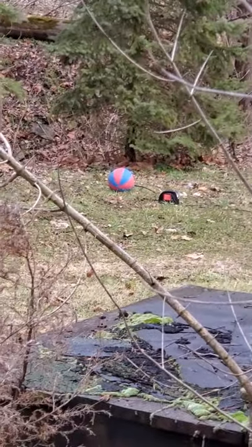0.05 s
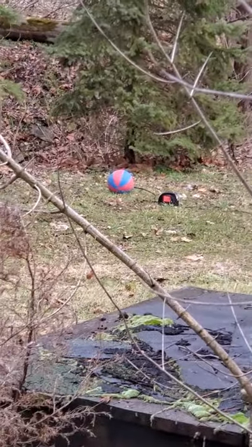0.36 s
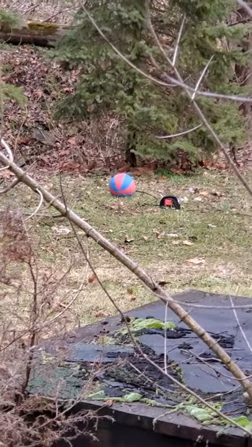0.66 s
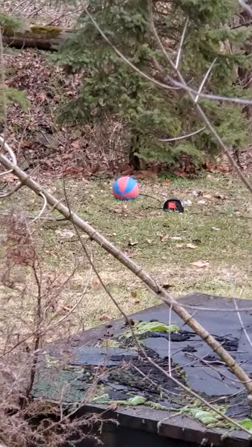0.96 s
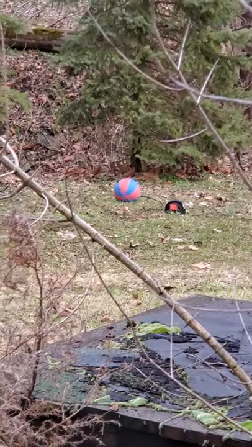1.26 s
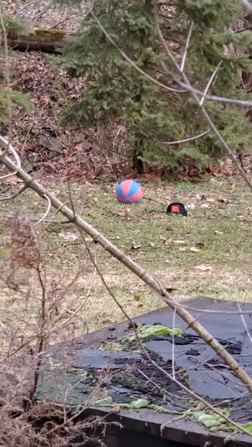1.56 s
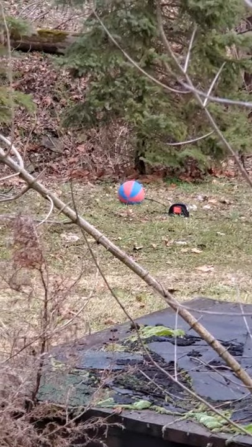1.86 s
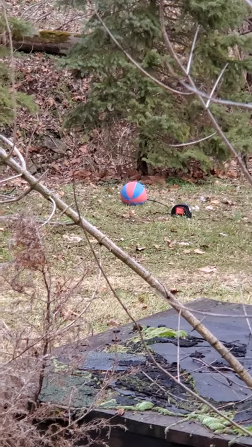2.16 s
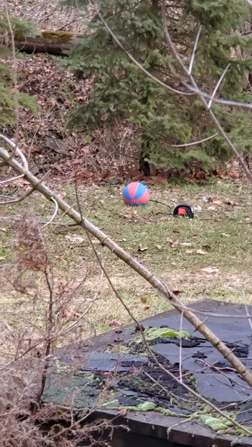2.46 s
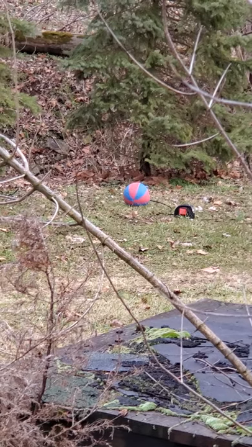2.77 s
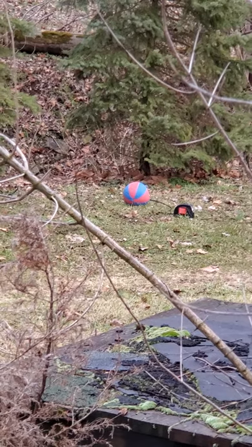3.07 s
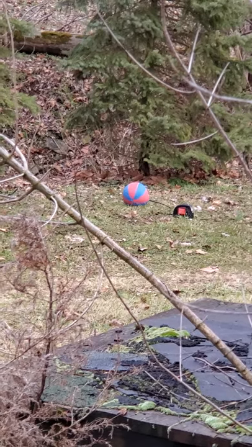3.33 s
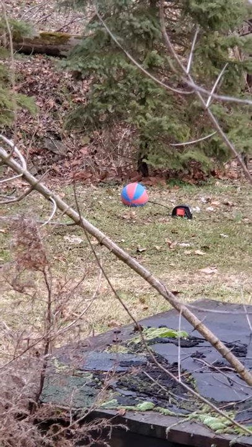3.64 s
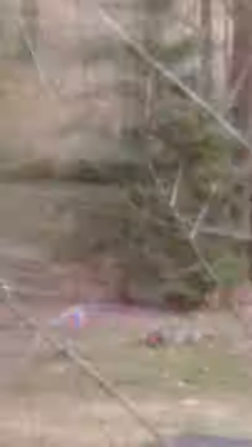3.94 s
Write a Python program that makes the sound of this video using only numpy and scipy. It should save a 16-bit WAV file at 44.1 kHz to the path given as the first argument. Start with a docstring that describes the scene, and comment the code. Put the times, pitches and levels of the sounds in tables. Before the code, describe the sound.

A ball bursts with a loud bang and short echo after an air compressor chatters quietly.

```python
"""A small air compressor chatters on a lawn, pumping up a ball, over a low outdoor rumble.
Early on comes one faint wooden tick; later a bird chirps faintly.
Near the end the ball bursts with one blast wave, which walls, trees and the slope throw back as a
short rolling echo. During the echo a few sharp ticks, likely flying scraps, land near the microphone."""
import sys
import numpy as np
from scipy import signal
from scipy.fft import rfft, irfft
from scipy.io import wavfile

SR = 44100
rng = np.random.default_rng(int(sys.argv[2]) if len(sys.argv) > 2 else 0)


def master(y):
    """Save y as 16-bit WAV."""
    cut = np.clip(np.atleast_2d(y).T, -1, 1)
    pcm = np.round(cut * 32767)  # scale
    wavfile.write(sys.argv[1], SR, pcm.astype(np.int16))


N = 176400
T = np.arange(N) / SR
HZ = np.fft.rfftfreq(N, 1 / SR)

# how alike left and right are for rushing air: f/Hz, likeness (1 = the same)
AIR_LIKENESS = [(25,1),(60,1),(250,1),(600,0.96),(1200,0.25),(3000,0.46),(15000,0.23)]


def amp(db):
    """Turns decibels into a factor to multiply by."""
    return 10 ** (np.asarray(db) / 20)


def unit(x):
    """Scales a signal to an average strength (rms) of 1."""
    return x / np.sqrt(np.mean(x ** 2) + 1e-20)


def spectrum(points):
    """Reads a table at every frequency, on a logarithmic scale."""
    hz, value = np.transpose(points)
    return np.interp(np.log(HZ + 1), np.log(hz + 1), value)


def curve(points):
    """Reads a table at every moment in time."""
    return np.interp(T, *np.transpose(points))


def add(mix, start_s, sound):
    """Mixes a sound in at a given time."""
    part = mix[..., round(start_s * SR):][..., :sound.shape[-1]]
    part += sound[..., :part.shape[-1]]


def drift(rate_hz):
    """A random wobble of strength 1; a higher rate makes it quicker."""
    return unit(irfft(rfft(rng.standard_normal(N)) * np.exp(-(HZ / rate_hz) ** 2) * (HZ > 0), N))


def noise(colour, likeness=AIR_LIKENESS):
    """Stereo noise of strength 1; its colour says how strong low and high frequencies are."""
    left, other = rfft(rng.standard_normal((2, N)))
    same = np.clip(spectrum(likeness), -1, 1)
    right = same * left + np.sqrt(1 - same ** 2) * other
    return unit(irfft(np.array([left, right]) * amp(spectrum(colour)), N))


def compressor(puff_decay_strokes=0.33, steady_flow=0.63):
    """Each piston stroke lets out puffs of rasping air; the housing hums at multiples of that rate."""
    # piston strokes per second: t/s, rate/Hz
    stroke_rate = [(0.0, 37.0), (0.46, 37.1), (1.57, 36.4), (2.2, 36.4), (2.37, 36.9), (3.7, 38.8)]
    # tones of the hum: multiple of the stroke rate, level/dB
    hum_tones = [(4,-62),(8,-70),(9,-70),(10,-62),(11,-60),(12,-68),(13,-68),(13.45,-68),(14.45,-65),(15.45,-70),(17,-71),(18,-72),(20,-68),(25,-75)]
    # puffs within one stroke: position (0-1), strength
    puffs = [(.1,1.),(.3,0.82),(.52,1)]
    # colours of the air's rasp and the higher fizz: f/Hz, relative level/dB
    rasp_colour = [(300,-3.5),(900,-6.5),(1500,-4),(2000,-16.5),(2480,-3),(2750,-8.5),(3150,0),(3400,-2.5),(3680,2.5),(3950,-16.5),(4450,-8),(4900,-21),(5500,-9.5),(5900,-33),(7500,-15.5),(8000,-18.5),(8550,-12.5),(9300,-14),(10200,-33.5),(11400,-24),(12500,-42),(14000,-39),(14600,-19),(16000,-36)]
    fizz_colour = [(2000,-25),(4100,0),(6000,-9),(9000,-6),(12000,-19),(16000,-17)]
    # how loud each is: t/s, level/dB
    rasp_level = [(0,-53),(1,-54),(2,-53),(2.8,-52.5),(3.3,-53.5),(4,-48)]
    fizz_level = [(0,-107),(1.4,-74),(2.2,-64),(2.8,-58.5),(3.3,-63),(4,-76)]
    strokes = np.cumsum(curve(stroke_rate) * (1 + .0012 * drift(rate_hz=6.4))) / SR
    hum = np.zeros(N)
    for multiple, db in hum_tones:
        strength = amp(db + 1.2 * drift(rate_hz=3.2)) * np.sqrt(2)
        hum += strength * np.sin(2 * np.pi * (multiple * strokes + rng.random()))
    puffing = sum(size * np.exp(-((strokes - at) % 1) / puff_decay_strokes) for at, size in puffs)
    rasp = amp(curve(rasp_level)) * noise(rasp_colour)
    fizz = amp(curve(fizz_level)) * noise(fizz_colour)
    return hum + unit(steady_flow + puffing) * (rasp + fizz)


def rumble(level_db=-47, swell_db=2):
    """Low outdoor air whose bass swells unevenly."""
    # colour of the rumble: f/Hz, relative level/dB
    colour = [(15,-50),(30,-25.5),(50,-6.5),(68,-0.5),(105,-4),(155,-6),(230,-13.5),(330,-15.5),(500,-20.5),(800,-18.5),(1200,-24.5),(2500,-30),(16000,-47)]
    air = noise(colour)
    bass = irfft(rfft(air) / (1 + (HZ / 220) ** 4), N)  # the part below 220 Hz
    swell = amp(swell_db * drift(rate_hz=5.6))
    return amp(level_db) * unit(air + bass * (swell - 1))


def wooden_tick():
    """One small dry tick, like a twig: a tone and gritty noise fade together."""
    # the tick: t/s, f/Hz, level/dB, time to fade by 60 dB/s
    tick = (.18,1890,-49,.06)
    start, hz, db, fade = tick
    out, t = np.zeros(N), T[:SR // 8]
    band = signal.butter(2, [hz, 2.1 * hz], "band", fs=SR)
    grit = unit(signal.lfilter(*band, rng.standard_normal(len(t))))
    add(out, start, amp(db - 60 * t / fade) * (np.sin(2 * np.pi * hz * t) + .9 * grit))
    return out


def bird(arch=.22, tail_s=0.059, blur_db=-3):
    """Thin whistles that rise and fall in pitch, blurred by the trees."""
    # chirps: t/s, length/s, top f/Hz, level/dB
    chirps = [(1.765,.04,7300,-68),(2.096,.06,7250,-59),(2.2,.045,6700,-59),(2.285,.04,6500,-64),(2.39,.035,6000,-65),(2.565,.04,6500,-64),(2.62,.03,6700,-63),(2.8,.033,7000,-67),(3.105,.05,7600,-60)]
    song, warble = np.zeros(N), .035 * drift(rate_hz=260)
    for start, length, top_hz, db in chirps:
        position = np.linspace(-1, 1, int(length * SR))  # 0 is the middle of the chirp
        hz = top_hz * (1 - arch * position ** 2 + warble[int(start * SR):][:len(position)])
        add(song, start, amp(db) * np.sqrt(1 - position ** 2) * np.sin(2 * np.pi * np.cumsum(hz) / SR))
    t = T[:SR // 4]
    trees = rng.standard_normal((2, len(t))) * np.exp(-t / tail_s)
    blur = signal.fftconvolve(song[None], trees / np.linalg.norm(trees[0]), axes=1)[:, :N]
    return song + amp(blur_db) * blur


def blast(shock_db=-3.7, shock_s=.0018, front_s=.0002, low_cut_hz=42):
    """The air pressure jumps, falls into suction and swings back a few times."""
    # swings of the released air: f/Hz, level/dB, decay/s, delay/s
    swings = [(176,-1.6,.0044,.0009),(50,-.7,.0038,.01)]
    t = T[:SR // 8]
    front = 1 - np.exp(-(t / front_s) ** 2)
    push_and_pull = (1 - (t / shock_s) ** 2) * np.exp(-.5 * (t / shock_s) ** 2)
    wave = amp(shock_db) * front * push_and_pull
    for hz, db, decay, delay in swings:
        age = np.maximum(t - delay, 0)
        wave -= amp(db) * np.exp(-age / decay) * np.sin(2 * np.pi * hz * age)
    return signal.lfilter(*signal.butter(3, low_cut_hz, "high", fs=SR), wave)


def burst(start_s=3.7833, spray_db=-20.5, spray_hold_s=.005, spray_decay_s=.0013):
    """The ball bursts and sprays air; sharp cracks set the microphone and its housing ringing briefly."""
    # sharp cracks: t/s after the burst, level/dB
    cracks = [(.0001,-3),(.0047,-13)]
    # tones of the brief ring after each crack: f/Hz, relative level/dB, time to fade by 60 dB/s
    mic_ring_tones = [(1288,-32,.06),(2515,-23,0.053),(2950,-30,0.027),(3650,-26,0.028)]
    # colour of the escaping air: f/Hz, relative level/dB
    spray_colour = [(300,-10),(1000,-16),(1800,-16),(2500,-4),(3000,0),(3700,-1),(4300,-5),(4800,-15),(6000,-11),(7200,-8),(10500,-22),(16000,-22)]
    out, t = np.zeros((2, N)), T[:SR // 8]
    add(out, start_s, blast())
    ring = sum(amp(db - 60 * t / fade) * np.sin(2 * np.pi * hz * t) for hz, db, fade in mic_ring_tones)
    for after, db in cracks:
        add(out, start_s + after, amp(db) * ring)
    spray_level = amp(spray_db) * np.exp(-np.maximum(t - spray_hold_s, 0) / spray_decay_s)
    add(out, start_s, spray_level * noise(spray_colour)[:, :len(t)])
    return out


def echo(hold_s=0.022, crackle_db=2.5):
    """Large surfaces throw the blast back; trees and the slope scatter it into crackling swells."""
    # separate echoes: t/s, gain/dB, thin below f/Hz, dull above f/Hz
    bounces = [(3.8212,-4,700,2200),(3.8256,-7,50,330),(3.8372,-7.5,40,330),(3.8495,-9,40,330),(3.8552,-10.5,70,400),(3.9635,-16,350,3000)]
    # swells of scattered sound: t/s, rise/s, decay/s, bass level/dB, treble level/dB
    swells = [(3.788,0.0044,.03,-29.5,-35.5),(3.808,0.0033,0.018,-25.5,-40),(3.821,0.0016,0.044,-24,-30.5),(3.874,0.021,0.099,-27.5,-40),(3.961,.003,.04,-32.5,-40)]
    # colours of their low and high parts: f/Hz, relative level/dB
    bass_colour = [(20,-48),(45,-10),(80,-5.5),(120,-1.5),(172,1.5),(260,-4.5),(340,-5),(500,-15.5),(700,-11.5),(900,-22),(2000,-57)]
    treble_colour = [(300,5),(800,-3.5),(1100,1),(1600,-0.5),(2000,0),(2600,1.5),(3600,-6),(4800,-8.5),(7000,-12.5),(10500,-24),(16000,-18)]
    # how alike left and right are: f/Hz, likeness (0-1)
    likeness = [(100,.99),(290,0.93),(640,0.74),(1400,0.028),(15000,.05)]
    out = np.zeros((2, N))
    for start, db, thin_hz, dull_hz in bounces:
        band = signal.butter(1, [thin_hz, dull_hz], "band", fs=SR)
        add(out, start, amp(db) * signal.lfilter(*band, blast()))
    bass, treble = np.zeros(N), np.zeros(N)
    for start, rise, decay, bass_db, treble_db in swells:
        fade = np.exp(-np.maximum(T - start - rise - hold_s, 0) / decay)
        shape = np.clip((T - start) / rise, 0, 1) * fade
        bass = np.hypot(bass, amp(bass_db) * shape)  # overlapping swells add their energy
        treble = np.hypot(treble, amp(treble_db) * shape)
    crackle = unit(amp(crackle_db * drift(rate_hz=760)))
    return out + bass * noise(bass_colour, likeness) + treble * crackle * noise(treble_colour, likeness)


def scraps(decay_s=0.00023):
    """Very short gritty ticks, likely scraps landing, each close to one side of the microphone."""
    # ticks: t/s, level/dB, f/Hz, left minus right/dB
    ticks = [(3.917,-26,10800,-7),(3.9175,-14.5,3600,21),(3.9184,-18,2320,24),(3.9177,-22,5600,12),(3.9216,-19,4800,13)]
    out, t = np.zeros((2, N)), T[:SR // 100]
    for start, db, hz, side_db in ticks:
        grit = 0.26 * rng.standard_normal(len(t))
        tick = np.exp(-t / decay_s) * (np.sin(2 * np.pi * hz * t) + grit)
        add(out, start, amp([[db + side_db / 2], [db - side_db / 2]]) * tick)
    return out


def from_the_side(sound):
    """Sound from the side reaches the microphone's two openings out of step."""
    # how far the left wave is ahead: f/Hz, phase/radians
    left_lead = [(0, -0.5), (1030, 0.5), (1980, 5.5), (3700, 7), (8270, 7), (11700, 10), (15400, 14.5),
                 (16300, 10)]
    return irfft(rfft(sound) * np.exp(1j * np.outer([0, -1], spectrum(left_lead))), N)


def scene():
    """Everything heard across the lawn."""
    return from_the_side(compressor() + rumble()) + wooden_tick() + bird() + burst() + echo() + scraps()


def record(dry, top_hz=15850):
    """Each microphone opening colours the sound its own way; peaks clip and the highest treble is cut."""
    # which side is louder: f/Hz, left minus right/dB
    balance = [(60, 1.5), (76, -1.5), (97, -1.5), (120, 3), (160, -3), (200, -2.5), (250, -1.0), (320, -4),
               (410, -0.5), (520, 8.5), (660, -0.5), (840, 1), (1070, -1.0), (1360, -1), (1730, 2),
               (2200, -6), (2790, -11), (3550, -7.5), (4520, -6), (5740, -0.5), (7300, -3.5), (9280, -8.5),
               (11800, -5), (15000, 5.5)]
    tilt_db = spectrum(balance) / 2
    coloured = irfft(rfft(dry) * amp([tilt_db, -tilt_db]), N)
    treble_cut = signal.firwin(511, top_hz, window=("kaiser", 9), fs=SR)
    return signal.oaconvolve(np.clip(coloured, -1, 1), treble_cut[None], "same")


dry = scene()
out = record(dry)
master(out)
```